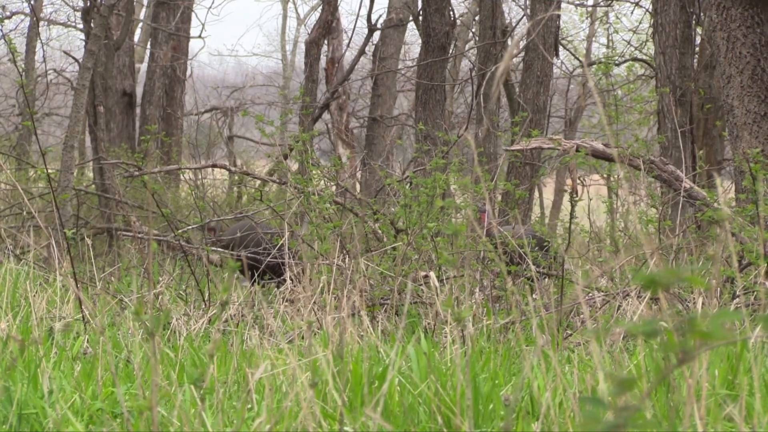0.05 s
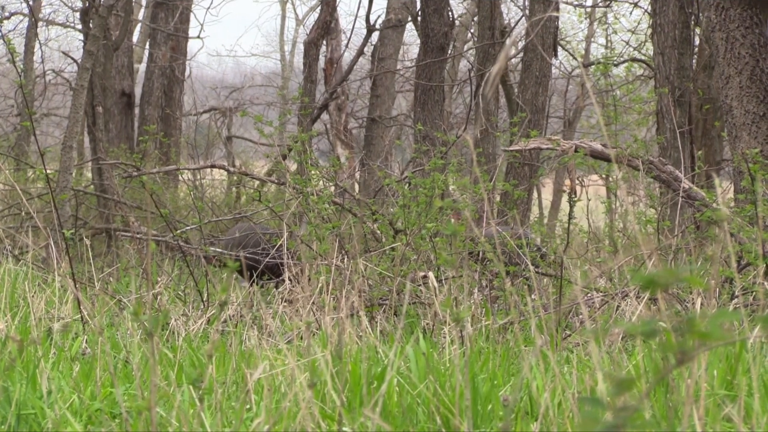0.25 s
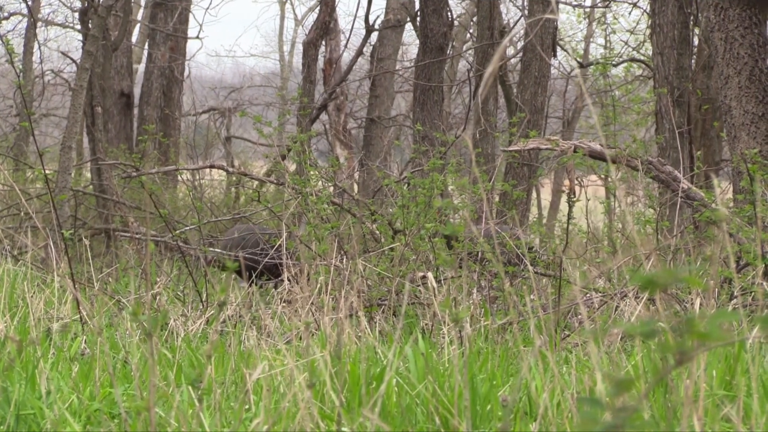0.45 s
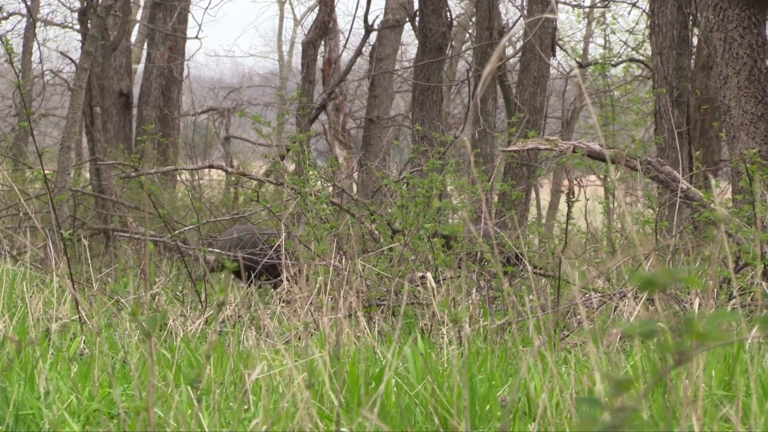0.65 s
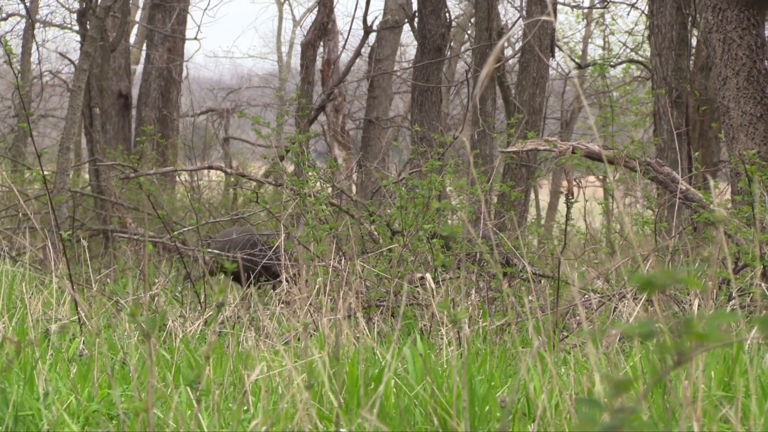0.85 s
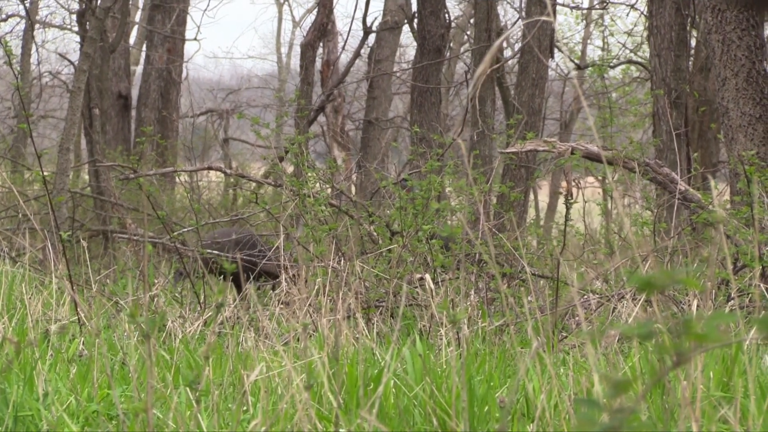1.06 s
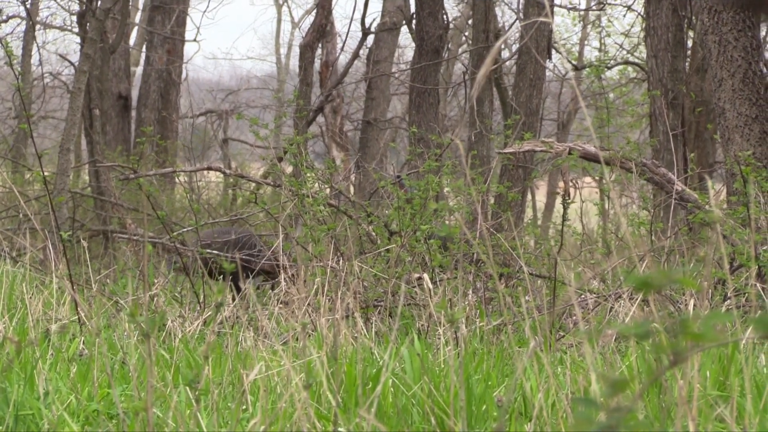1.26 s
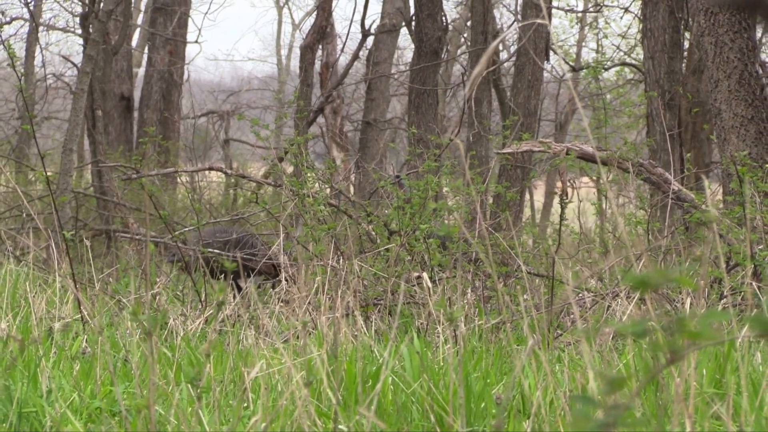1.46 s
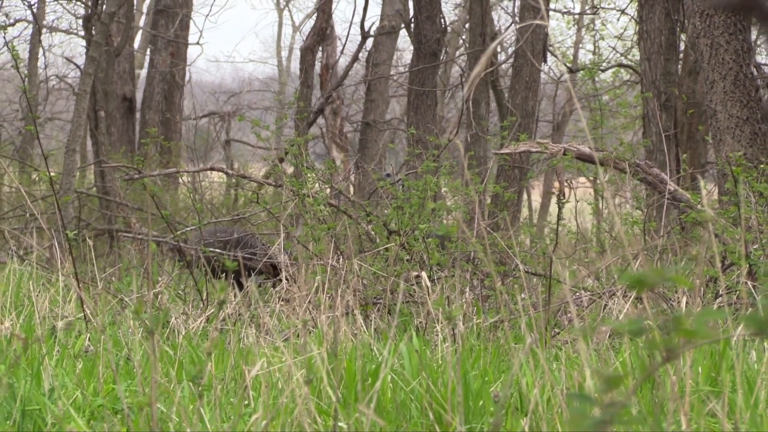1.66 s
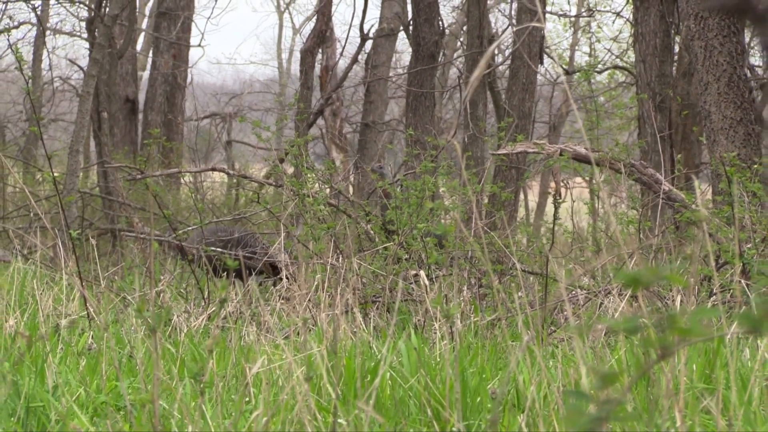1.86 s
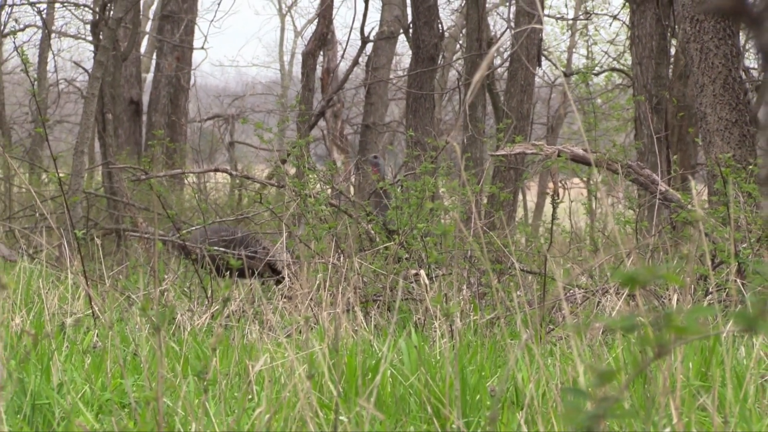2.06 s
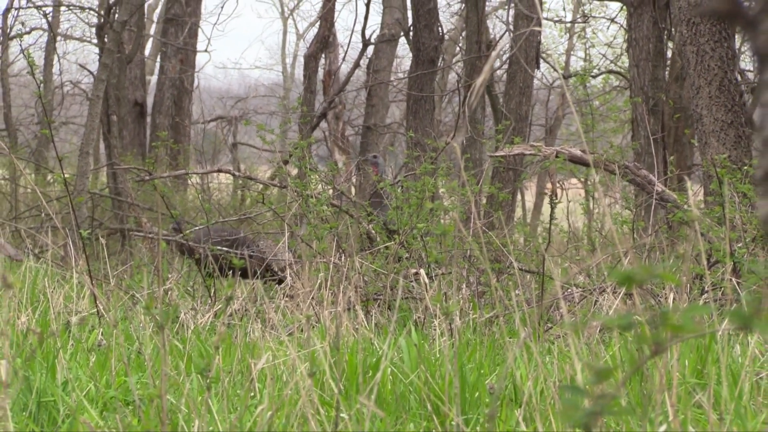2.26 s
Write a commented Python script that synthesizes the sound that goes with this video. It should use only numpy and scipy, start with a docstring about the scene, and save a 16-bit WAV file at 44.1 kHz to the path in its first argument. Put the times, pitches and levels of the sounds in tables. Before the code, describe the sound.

A wild turkey yelps five times at an even pace, each a thin whistle breaking into a reedy note with a rising chirp; woodland echoes, low wind rumble on the microphone, left channel only, hiss on both.

```python
"""Turkey yelps at the wood's edge

A wild turkey yelps in an even run; the first call is over before the start, so only its echoes are heard.
Each yelp is a thin whistle that breaks into a loud reedy note, flutters softly and ends in a rising chirp,
all pulses of the syrinx coloured by the throat. Delayed dull copies and decaying noise make the wood's echo.
A songbird peeps once far off, a gliding sine. Shaped noise makes the wind rumble on the microphone, which
feeds the left channel only, the faint air in the trees, and the preamp hiss of both channels."""
import sys
import numpy as np
from scipy import signal
from scipy.fft import rfft, irfft
from scipy.io import wavfile
from scipy.ndimage import uniform_filter1d

SR = 44100
rng = np.random.default_rng(int(sys.argv[2]) if len(sys.argv) > 2 else 0)


def dump(signal):
    """Clip the signal to [-1, 1] and save it as 16-bit WAV at the path in sys.argv[1]."""
    limited = np.clip(np.atleast_2d(signal).T, -1, 1)
    pcm = np.round(limited * 32767).astype(np.int16)
    wavfile.write(sys.argv[1], SR, pcm)


N = 101429


def amp(db):
    """Decibels to gain."""
    return 10 ** (np.asarray(db) / 20)


def unit(x):
    """Scales to rms 1."""
    return x / np.sqrt(np.mean(x ** 2) + 1e-20)


def read(points, hz):
    """Reads a spectrum table on a log-frequency axis."""
    f, value = np.transpose(points)
    return np.interp(np.log(hz + 1), np.log(f + 1), value)


def add(mix, s, sound):
    """Mixes a sound in at time s, in seconds."""
    part = mix[max(round(s * SR), 0):][:len(sound)]
    part += sound[:len(part)]


def colour(x, points):
    """Filters by a spectrum table."""
    gain = amp(read(points, np.fft.rfftfreq(len(x), 1 / SR)))
    return irfft(rfft(x) * gain, len(x))


def noise(points):
    """Steady noise of a given spectrum, at rms 1."""
    return unit(colour(rng.standard_normal(N), points))


def drift(rate_hz):
    """Smooth random wander at rms 1, falling away steeply above the given rate."""
    hz = np.fft.rfftfreq(N, 1 / SR)
    return unit(irfft(rfft(rng.standard_normal(N)) / (1 + (hz / rate_hz) ** 4), N))


def turkey():
    """Every yelp with its chirp; the bird moves, so the wood answers each one differently."""
    # The yelps. Each row: time of the voice break in s, whistle before it in s, fall in s,
    # whistle pitch in Hz, low pitch in Hz, whistle level in dB re the note, note level in dB,
    # hold in s, soft ending in dB re the note, its roughness 0-1, brightness in dB per octave,
    # send into the wood in dB.
    yelp_rows = [(-.15, .015, 0.021, 861, 731, -6, -17, 0.0062, -17, 0.2, 4, -2),
                 (.209, 0.018, 0.009, 862.4, 740.7, 0, -21.5, 0.0068, -7, 0.57, 3, 3),
                 (0.56, 0.012, 0.017, 845, 744.7, -2.5, -21.5, 0.0036, -16, .1, 2.5, 3),
                 (0.936, .014, .018, 869.4, 733.7, -6, -20, 0.007, -7, 0, -0.5, 2.5),
                 (1.302, .024, 0.01314, 886.5, 715.5, -6.5, -19, 0.004, -9.5, 0.03, 0, 0.5),
                 (1.649, .014, 0.01916, 845.7, 724.4, -3, -19, 0.0051, -6.5, 0.08, 0, 1)]
    # The closing chirps. Each row: start in s, length before the flick in s, first pitch in Hz,
    # last pitch before the flick in Hz, level in dB, send into the wood in dB.
    chirp_rows = [(-.07, .012, 779, 922, -20.5, -1), (0.2852, 0.00556, 808, 885, -18, 1),
                  (0.63, .013, 721.5, 850, -23, 3), (1.010, 0.008, 744, 862, -21.5, 1.5),
                  (1.37, .012, 719.5, 862, -22, 1), (1.721, 0.0087, 753, 882, -19.5, 1.5)]
    lead_s = .3  # room for the call that comes before the start
    lead = round(lead_s * SR)
    out = np.zeros(N + lead)
    for yelp_row, chirp_row in zip(yelp_rows, chirp_rows):
        sent = np.zeros(N + lead)
        for note, (*row, sent_db) in ((yelp, yelp_row), (chirp, chirp_row)):
            start, sound = note(*row)
            add(out, start + lead_s, sound)
            add(sent, start + lead_s, amp(sent_db) * sound)
        out += woods(sent)
    return out[lead:]


# The whistle grows and lifts (share of its pitch); full voice comes part way down the fall.
ONSET_DB, WHISTLE_RISE, SWELL_SHARE = -18, 0.037, 0.68
REBOUND_S, REBOUND_HZ = .016, 776.4  # after the low note the pitch springs back
# Then it sags softly and stops; the length counts from the voice break.
END_HZ, SAG_DB, CLOSE_DB, RELEASE_S, LENGTH_S = 763.5, -6, -25, 0.011, .063
WHISTLE_PURITY = .85  # a fainter whistle is purer: dB per octave for each dB
BREAK_TILT_DB, NOTE_TILT_DB, SOFT_TILT_DB = 2, -1.5, -4  # brightness along the yelp, per octave
# A second oscillation of the syrinx shakes the soft ending.
FLUTTER_HZ, FLUTTER_DEPTH, FLUTTER_RISE_S = 300.3, 0.61, 0.013


def yelp(at, lead, fall, high_hz, low_hz, whistle_db, note_db, hold, soft_db, soft_rough, bright_db):
    """A whistle breaks down to the loud note, springs back, and dies in a soft, dull flutter."""
    full = fall * SWELL_SHARE
    hold_end = fall + hold
    back = fall + REBOUND_S
    t = np.arange(-lead, LENGTH_S, 1 / SR)  # zero at the voice break
    hz = np.interp(t, [-lead, 0, fall, hold_end, back, LENGTH_S],
                   [high_hz * (1 - WHISTLE_RISE), high_hz, low_hz, low_hz, REBOUND_HZ, END_HZ])
    smooth_hz = uniform_filter1d(hz, size=160)
    effort_db = np.interp(
        t, [-lead, 0, full, hold_end, back, LENGTH_S - RELEASE_S, LENGTH_S],
        [whistle_db + ONSET_DB, whistle_db, 0, 0, soft_db, soft_db + SAG_DB, CLOSE_DB])
    tilt_db = bright_db + np.interp(
        t, [0, full, hold_end, back],
        [WHISTLE_PURITY * whistle_db, BREAK_TILT_DB, NOTE_TILT_DB, SOFT_TILT_DB])
    unsteady = np.clip((t - back) / FLUTTER_RISE_S, 0, 1)
    flutter = 1 + FLUTTER_DEPTH * unsteady * np.cos(2 * np.pi * FLUTTER_HZ * t)
    sung = voice(smooth_hz, effort_db, soft_rough * unsteady, tilt_db)
    return at - lead, amp(note_db) * flutter * sung


CHIRP_ATTACK_S, CHIRP_ONSET_DB, CHIRP_END_DB = .004, -11.5, 2.5  # end level before the flick
CHIRP_BEND, CHIRP_ROUGH, CHIRP_TILT_DB = 2.4, .1, -1.14  # curve power, roughness 0-1, dB per octave
FLICK_S, FLICK_HZ, FLICK_BEND, FLICK_DB, FLICK_END_DB = 0.01262, 2196, 1.145, -9, -3


def chirp(start, length, first_hz, last_hz, level_db):
    """The short closing note bends upward, then flicks up by more than an octave as it cuts off."""
    t = np.arange(-CHIRP_ATTACK_S, length + FLICK_S, 1 / SR)
    bend = np.clip(t / length, 0, 1) ** CHIRP_BEND
    flick = np.clip((t - length) / FLICK_S, 0, 1) ** FLICK_BEND
    hz = first_hz + (last_hz - first_hz) * bend + (FLICK_HZ - last_hz) * flick
    effort_db = np.interp(t, [t[0], .001, length, length + FLICK_S / 4, t[-1]],
                          [CHIRP_ONSET_DB, 0, CHIRP_END_DB, FLICK_DB, FLICK_END_DB])
    return start - CHIRP_ATTACK_S, amp(level_db) * voice(hz, effort_db, CHIRP_ROUGH, CHIRP_TILT_DB)


DULL_DB_PER_OCTAVE, DULL_PIVOT_HZ = 0.76, 1670  # treble lost above the pivot for each dB of lower effort
JITTER, ROUGH_JITTER, JITTER_HZ = .005, 0.065, 497  # pitch shake as a share of pitch, and its rate
RASP_DB, ROUGH_RASP = -28, .9  # breath always there, and gain added by full roughness
THROAT_LAG = 0.094  # radians: upper harmonics lag, which spreads each pulse


def voice(hz, effort_db, rough, tilt_db):
    """Syrinx pulses through the throat; soft notes are duller, rough ones jitter and turn to rasp."""
    # Throat and open bill. Each row: frequency in Hz, level of a harmonic there in dB.
    throat = [(600, -29), (740, -22.5), (880, -14.5), (1230, -13.5), (1500, -1), (1750, -1.5), (2200, 1),
              (2500, -3), (2850, -10.5), (3130, -1.5), (3550, -9.5), (3830, -14), (4150, -18.5),
              (4400, -20.5), (5000, -34.5), (5900, -49.5), (7500, -42)]
    hz = hz * (1 + (JITTER + ROUGH_JITTER * rough) * drift(JITTER_HZ)[:len(hz)])
    phase = 2 * np.pi * np.cumsum(hz) / SR
    k = np.arange(1, 10)[:, None]  # harmonic numbers
    octaves_over_pivot = np.log2(np.maximum(k * hz / DULL_PIVOT_HZ, 1))
    dull_db = DULL_DB_PER_OCTAVE * effort_db * octaves_over_pivot
    dull_db = dull_db + tilt_db * np.log2(np.maximum(k / 2, 1))  # tilt starts above the second harmonic
    harmonics = amp(read(throat, k * hz) + dull_db) * np.cos(k * phase - THROAT_LAG * k ** 2)
    tone = harmonics.sum(0)
    rasp_gain = amp(RASP_DB) + ROUGH_RASP * rough
    rasp = rasp_gain * noise(throat)[:len(hz)] * (1 + np.cos(phase))  # breath pulses with the pitch
    return (tone + rasp) * amp(effort_db) * signal.windows.tukey(len(hz), .08)


def woods(x):
    """Dull slaps off the nearest trunks, quick scatter from the brush, a long tail from the wood."""
    # Echoes off the nearest trunks. Each row: delay in s, level in dB.
    trunks = [(0.011, -32.5), (.021, -9.5), (.033, -9)]
    # Scatter of the brush. Each row: frequency in Hz, level in dB.
    brush = [(700, -3), (1200, -13.5), (1500, -9), (1800, -6), (2300, -16), (3200, -12), (5000, -9.5)]
    # Scatter of the deep wood. Each row: frequency in Hz, level in dB.
    deep_wood = [(700, -4), (1200, -10), (1420, -2.5), (1505, -4.5), (1590, -15), (1850, -4.5), (2400, -20),
                 (3200, -17.5), (5000, -4)]
    # Decay of the deep wood. Each row: frequency in Hz, time to fall by 60 dB in s.
    deep_wood_t60 = [(700, 0.94), (1550, 0.93), (2300, 0.69), (3200, 0.92), (5000, 0.37)]
    out = scatter(x, brush, [(1000, 0.15)], rise_s=0.0046)  # one decay time, 0.15 s, for all bands
    out = out + scatter(x, deep_wood, deep_wood_t60, rise_s=0.024)
    trunk_edge_hz = 1790
    dull = signal.sosfilt(signal.butter(4, trunk_edge_hz, fs=SR, output="sos"), x)
    for delay, db in trunks:
        add(out, delay, amp(db) * dull)
    return out


def scatter(x, points, t60_points, rise_s):
    """Countless small echoes, as noise that builds up and dies, each band at its own speed."""
    hz, t, z = signal.stft(rng.standard_normal(SR), SR, nperseg=256)
    fade = amp(-60 * t / read(t60_points, hz)[:, None]) * np.minimum(t / rise_s, 1) ** 2
    fade /= np.sqrt(SR * np.mean(fade ** 2, 1, keepdims=True))  # equal energy in every band
    band_gain = amp(read(points, hz))[:, None]
    tail = signal.istft(z * fade * band_gain, SR, nperseg=256)[1]
    return signal.fftconvolve(x, tail)[:len(x)]


def songbird():
    """One faint, mostly falling peep: a gliding sine, smeared by the wood."""
    # The peep, far off. Each row: time in s, pitch in Hz, level in dB.
    peep = [(1.084, 7530, -70), (1.096, 7500, -54), (1.108, 7200, -57), (1.12, 6740, -59),
            (1.138, 6900, -66)]
    at, hz, db = np.transpose(peep)
    t = np.arange(at[0], at[-1], 1 / SR)
    phase = 2 * np.pi * np.cumsum(np.interp(t, at, hz)) / SR
    out = np.zeros(N)
    add(out, at[0], amp(np.interp(t, at, db)) * np.sin(phase))
    return out + woods(out)


WIND_DB, AIR_DB = -40, -48.5  # levels before gusts and sway
WIND_SWAY_DB, AIR_SWAY_DB = 1, 2.47  # rms of the random level sway


def wind():
    """Lumpy rumble with a few gusts and a closing lull, over the faint air in the trees."""
    # Wind on the microphone. Each row: frequency in Hz, relative level in dB per Hz.
    rumble_spectrum = [(10, -6), (25, -10), (45, -9), (62, -0.5), (76, -4.5), (93, 0.5), (115, -8.5),
                       (170, -9.5), (250, -22.5), (500, -26.5), (2000, -52.5)]
    # Far air in the trees. Each row: frequency in Hz, relative level in dB per Hz.
    air_spectrum = [(100, -0.5), (300, -1), (500, -2.5), (800, -2.5), (1150, -12), (1600, -7.5),
                    (2400, -10), (4000, -20.5), (15000, -34)]
    # Gusts, and a lull where negative. Each row: centre in s, width in s, level change in dB.
    gusts = [(0.329, 0.037, 3.5), (1.099, 0.012, 8), (1.209, 0.012, 9), (1.61, 0.031, 4),
             (1.92, 0.18, -2.5)]
    t = np.arange(N) / SR
    gust_db = sum(db * np.exp(-((t - at) / width) ** 2) for at, width, db in gusts)
    rumble = noise(rumble_spectrum) * amp(WIND_DB + gust_db + WIND_SWAY_DB * drift(19))
    air = noise(air_spectrum) * amp(AIR_DB + AIR_SWAY_DB * drift(9.7))
    return rumble + air


def scene():
    """One microphone, on the left channel; the right is empty."""
    return np.array([turkey() + songbird() + wind(), np.zeros(N)])


def record(dry):
    """Each channel adds its own preamp hiss; then the band limit."""
    # Preamp hiss. Each row: frequency in Hz, relative level in dB per Hz.
    hiss_spectrum = [(20, 13.5), (120, 8.5), (400, 5.5), (1000, 1), (2000, 0), (15000, -0.5)]
    hiss_db, edge_hz = -52, 15900
    hiss = amp(hiss_db) * np.array([noise(hiss_spectrum), noise(hiss_spectrum)])
    lowpass = signal.firwin(511, edge_hz, window=("kaiser", 9), fs=SR)
    return signal.oaconvolve(dry + hiss, lowpass[None], "same")


dry = scene()
out = record(dry)
dump(out)
```